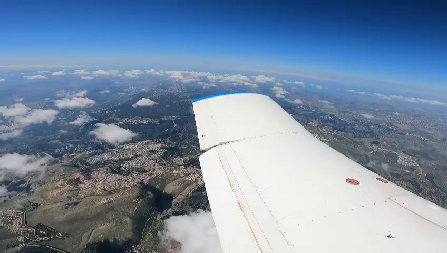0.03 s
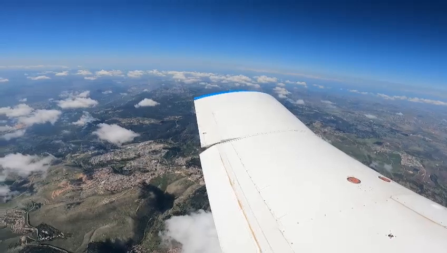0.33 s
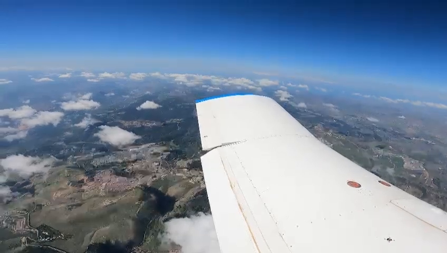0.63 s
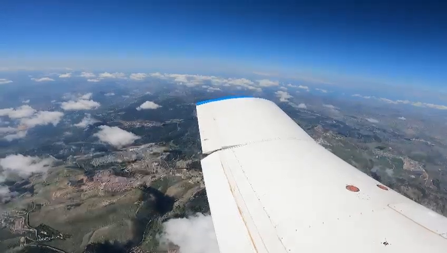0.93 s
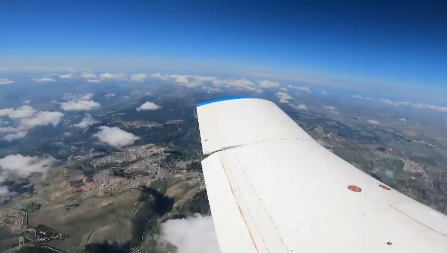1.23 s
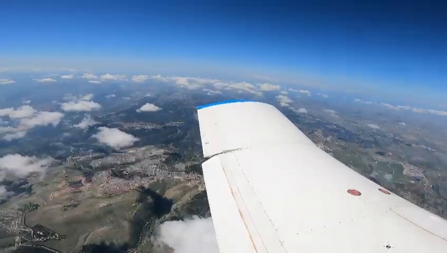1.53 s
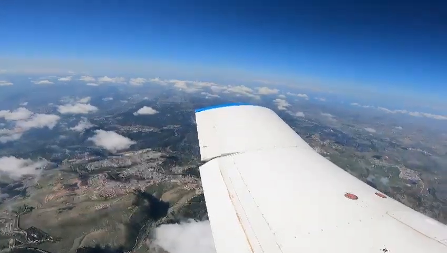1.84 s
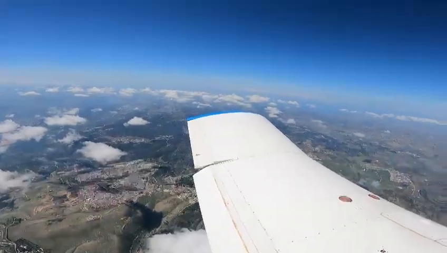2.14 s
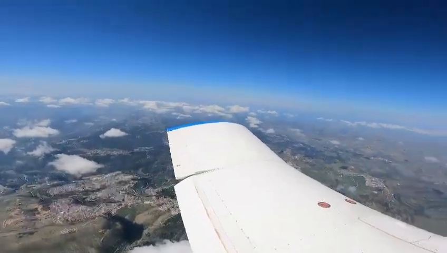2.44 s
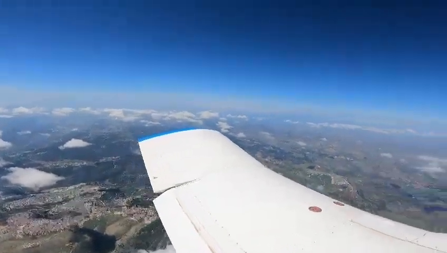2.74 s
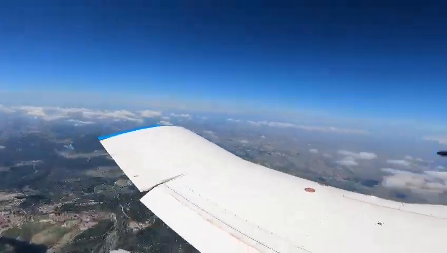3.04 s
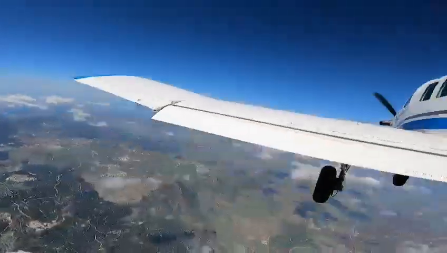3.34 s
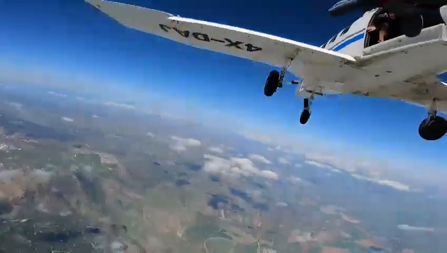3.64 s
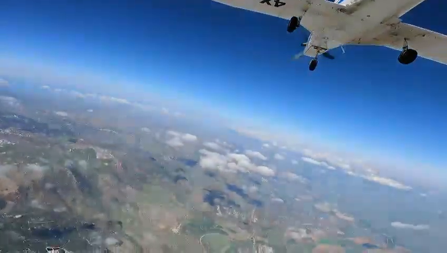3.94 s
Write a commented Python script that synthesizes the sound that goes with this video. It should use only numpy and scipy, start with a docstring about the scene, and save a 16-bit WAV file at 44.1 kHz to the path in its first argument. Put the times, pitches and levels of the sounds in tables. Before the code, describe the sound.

Loud wind roars and buffets the microphone from the start, with short crackling gusts and a propeller droning underneath. Around 2.9 seconds the wind tears harder and the drone swells, then sinks in pitch and fades as the skydiver leaves the plane. Low thumps and a rumble hit from about 3.5 to 3.75 seconds. A quieter, brighter rush with a breathy rising whistle takes over until 4 seconds.

```python
"""Skydiver leaving a propeller plane

Heard from a camera outside the door, then falling away. The slipstream buffets and roars on the
microphone and tears in short bursts; the propeller drones beneath it and sinks in pitch after the jump.
Past the thumping wake the roar gives way to a bright rush and a whistle. A limiter holds the peaks."""
import sys
import numpy as np
from scipy import signal
from scipy.fft import rfft, irfft
from scipy.io import wavfile
from scipy.ndimage import uniform_filter1d, minimum_filter1d

SR = 44100
rng = np.random.default_rng(int(sys.argv[2]) if len(sys.argv) > 2 else 0)


def generate_wav(sig):
    """Save sig (samples, or channels by samples) to the path in sys.argv[1] as 16-bit PCM at SR."""
    pcm = np.round(np.clip(np.atleast_2d(sig).T, -1, 1) * 32767).astype(np.int16)
    wavfile.write(sys.argv[1], SR, pcm)


N = 176400
T = np.arange(N) / SR
HZ = np.fft.rfftfreq(N, 1 / SR)


def amp(db):
    """Decibels to gain."""
    return 10 ** (np.asarray(db) / 20)


def unit(x):
    """Scale to rms 1."""
    return x / np.sqrt(np.mean(x ** 2) + 1e-20)


def curve(points):
    """Rows of (t/s, value) interpolated to every sample."""
    return np.interp(T, *np.transpose(points))


def coloured(x, spectrum):
    """Filter x by rows of (f/Hz, level/dB); rms 1."""
    hz, db = np.transpose(spectrum)
    gain = amp(np.interp(np.log(HZ + 1), np.log(hz + 1), db))
    return unit(irfft(rfft(x) * gain, N))


def noise(spectrum):
    """Shaped noise, rms 1."""
    return coloured(rng.standard_normal(N), spectrum)


def wander(rate_hz, slowest_hz=3):
    """Smooth random motion between two rates; rms about 1, peaks softened."""
    gain = HZ / (HZ + slowest_hz) / (1 + (HZ / rate_hz) ** 2)
    motion = unit(irfft(rfft(rng.standard_normal(N)) * gain, N))
    return 3 * np.tanh(motion / 3)


def stirred(spectrum, flow, eddy_db, gust_db, own_db):
    """Noise whose level follows the shared eddies and gusts, plus its own flutter."""
    eddies, gusts = flow
    return unit(noise(spectrum) * amp(eddy_db * eddies + gust_db * gusts + own_db * wander(130)))


def churning(spectrum, evenness):
    """Noise with swells and lulls partly evened out, as under steady wind pressure."""
    x = noise(spectrum)
    power = uniform_filter1d(abs(signal.hilbert(x)) ** 2, size=441)
    return unit(x / (power + 0.12) ** (evenness / 2))


def puffs(table):
    """Envelope of Gaussian swells, summed in power."""
    return np.sqrt(sum(amp(db) ** 2 * np.exp(-np.pi * ((T - centre_s) / length_s) ** 2)
                       for centre_s, length_s, db in table))


def gliding_band(table, width_hz, order=1):
    """Noise band riding on a multiple of a moving pitch."""
    times_s, hz, db = np.transpose(table)
    band = unit(irfft(rfft(rng.standard_normal(N)) / (1 + (HZ / width_hz) ** 2) ** 2, N))
    carrier = np.sin(2 * np.pi * order * np.cumsum(np.interp(T, times_s, hz)) / SR)
    return amp(np.interp(T, times_s, db)) * unit(band * carrier)


def propeller():
    """Blade-rate harmonics, shaken in level and phase by turbulent air."""
    # blade passage: t/s, f/Hz
    blade_rate = [(0, 91.95), (1, 92.14), (2.7, 91.9), (3.05, 89.8), (3.4, 86.6), (3.7, 86), (4, 87.8)]
    # drone envelope: t/s, level/dB
    level = [(0, -20), (.5, -26), (.67, -15.5), (.8, -28), (1.2, -24), (1.47, -21.5), (1.8, -23),
             (2.05, -21), (2.25, -26), (2.5, -20.5), (2.72, -21.5), (3.0, -12.5), (3.2, -21), (3.45, -29.5),
             (3.75, -28.5), (4, -42)]
    # harmonics: multiple, level/dB
    harmonics = [(1, 4), (2, -6), (4, -9)]
    cycles = np.cumsum(curve(blade_rate)) / SR
    tone = np.zeros(N)
    for k, db in harmonics:
        gain = amp(db + 2.0 * wander(22, slowest_hz=6.5))
        tone += gain * np.sin(2 * np.pi * (k * cycles + rng.random()) + .25 * k * wander(13))
    return amp(curve(level) + 2.5) * unit(tone)


def open_air():
    """Smooth, bright rush swelling as the jumper falls clear."""
    # rush envelope: t/s, level/dB
    level = [(3.62, -78.5), (3.68, -44.5), (3.76, -41), (3.83, -31), (3.9, -30.5), (4, -29.5)]
    # rush spectrum: f/Hz, level/dB
    spectrum = [(200, -4.5), (450, 5), (800, 7.5), (1300, 3.5), (2100, -1), (3100, 1), (4200, -1.5),
                (5100, -4.5), (6500, -5), (8000, -14), (10000, -25), (11600, -32.5)]
    return amp(curve(level) + 0.64 * wander(30)) * noise(spectrum)


def airflow_resonance():
    """Faint resonance and its octave, rising as the camera turns from the plane."""
    # resonance track: t/s, f/Hz, level/dB
    sweep = [(3.15, 930, -70), (3.32, 1020, -36), (3.42, 1113, -39), (3.52, 1388, -38), (3.6, 1390, -60)]
    return gliding_band(sweep, width_hz=170) + amp(-6) * gliding_band(sweep, width_hz=170, order=2)


def whistle():
    """Air past the camera: a breathy band with a narrow core, climbing with fall speed."""
    # whistle track: t/s, f/Hz, level/dB
    track = [(3.618, 3490, -79), (3.681, 3720, -42.5), (3.738, 3890, -42.5), (3.83, 4160, -37),
             (4, 4164, -40)]
    return amp(-0.6) * gliding_band(track, width_hz=1100) + amp(-8) * gliding_band(track, width_hz=260)


def hiss(flow):
    """Fine hiss in the slipstream."""
    # hiss envelope: t/s, level/dB
    level = [(.1, -46), (.3, -54), (.56, -54), (.67, -50), (.76, -54), (1.5, -53.5), (2.7, -52.5),
             (2.84, -56), (2.86, -37), (2.9, -45), (2.94, -47), (2.97, -62), (3.1, -46), (3.15, -42.5),
             (3.26, -48), (3.42, -59), (3.6, -43), (3.63, -51.5)]
    # hiss spectrum: f/Hz, level/dB
    spectrum = [(1500, 0), (3000, 7), (4200, 4.5), (5500, -2.5), (7000, -7.5), (9000, -12), (10300, -23),
                (11600, -41)]
    return amp(curve(level) + 5.0) * stirred(spectrum, flow, eddy_db=1.0, gust_db=0.9, own_db=-0.1)


def spits():
    """Air spits on the microphone: snaps with ragged tails, dulled by its cover."""
    # spits: t/s, peak level/dB
    hits = [(.167, -22), (0.2234, -25), (.2284, -23), (0.3043, -17.5), (0.3386, -22), (0.371, -20.5),
            (.4274, -16.5), (0.5204, -17.5), (0.703, -20.5), (0.968, -19), (1.026, -21), (1.0713, -19),
            (1.6891, -21.5), (1.7776, -30), (1.8337, -23), (1.8594, -23), (2.1822, -29), (2.5244, -24),
            (2.7373, -18.5), (2.7819, -20.5), (2.8553, -18), (2.8787, -9), (2.946, -14), (3.3369, -16)]
    # spit spectrum: f/Hz, level/dB
    spectrum = [(200, -3.5), (900, 4), (2200, 1), (4000, -4), (6000, -15.5), (9000, -33), (11500, -55)]
    decay_s = 0.0006
    tails = sum(amp(db) * (T >= at_s) * np.exp(-abs(T - at_s) / decay_s) for at_s, db in hits)
    snaps = np.maximum(np.diff(tails, prepend=0), 0)
    bursts = amp(10.0) * snaps + amp(-4.5) * tails * rng.standard_normal(N)
    return np.std(bursts) * coloured(bursts, spectrum)


def tearing(flow):
    """Flow breaking off the camera body: crackling noise, flaring in gusts, smoother after the jump."""
    # tearing envelope: t/s, level/dB
    level = [(.1, -34.5), (.3, -41.5), (.46, -35.5), (.58, -38), (.8, -39.5), (1.3, -44), (1.6, -44.5),
             (1.8, -39), (1.9, -50), (2.02, -43.5), (2.23, -45.5), (2.36, -39.5), (2.58, -45.5),
             (2.71, -39.5), (2.81, -33.5), (2.89, -29.5), (2.98, -29.5), (3.1, -31.5), (3.2, -31.5),
             (3.3, -31.5), (3.35, -29.5), (3.42, -32), (3.51, -29), (3.615, -38.5), (3.64, -59),
             (3.77, -41), (4, -37)]
    # tearing spectrum: f/Hz, level/dB
    spectrum = [(200, -8), (600, -1.5), (1050, 7), (1700, 2.5), (2600, -2.5), (4000, -12), (5500, -22),
                (8000, -31), (10000, -40), (12000, -64.5)]
    # raggedness: t/s, share of flow modulation
    ragged = [(2.8, 1), (3.2, 0.3)]
    # gusts across the microphone: centre t/s, length/s, peak level/dB
    gusts = [(.168, 0.031, -29.5), (.22, 0.018, -23.5), (.308, 0.043, -26.5), (.371, 0.0066, -29),
             (.425, 0.039, -32), (.517, 0.0056, -30), (.665, 0.042, -26.5), (.86, 0.034, -33.5),
             (.922, 0.012, -32), (.968, 0.0089, -33), (1.035, .014, -29.5), (1.252, .016, -31),
             (1.382, 0.016, -32), (1.43, .012, -34), (1.537, 0.0082, -34), (1.776, 0.0081, -28),
             (1.857, 0.021, -29), (1.978, 0.017, -31), (2.445, 0.019, -42), (2.528, 0.01, -27),
             (2.868, 0.05, -23.5), (2.915, 0.049, -29)]
    # gust spectrum: f/Hz, level/dB
    gust_spectrum = [(200, 1), (700, 13.5), (1500, 9.5), (2600, -5.5), (4000, -7), (5500, -19.5),
                     (8000, -31.5), (11500, -58)]
    snaps_per_s = 1100
    snaps = (rng.random(N) < snaps_per_s / SR) * rng.uniform(-1.02, 1, N)
    crackle = amp(-7.5) * unit(coloured(snaps, spectrum) * amp(1.1 * flow[0]))
    calmed = np.array(flow) * curve(ragged)
    steady = stirred(spectrum, calmed, eddy_db=3.0, gust_db=2.0, own_db=1.0) + crackle
    ripping = stirred(gust_spectrum, flow, eddy_db=5.0, gust_db=-1.5, own_db=2.5) + crackle
    return amp(curve(level) + 3.0) * steady + amp(1.5) * puffs(gusts) * ripping


def hoot():
    """Hollow, hooting part of the roar."""
    # hoot envelope: t/s, level/dB
    level = [(.1, -37), (1.0, -25), (1.4, -21), (2.1, -21), (2.7, -19.5), (3.2, -23.5), (3.35, -28.5),
             (4, -55)]
    # hoot spectrum: f/Hz, level/dB
    spectrum = [(20, -71.5), (120, -15), (205, -2), (245, 11), (295, 10.5), (340, 6), (395, 3.5),
                (460, -10), (800, -34.5), (8000, -110)]
    return amp(curve(level) + 0.6) * churning(spectrum, evenness=0.36)


def wake():
    """Falling through the plane's wake: low thumps and a rumble that holds, then stops dead."""
    # thumps: centre t/s, length/s, peak level/dB
    thumps = [(3.265, 0.03, -19), (3.6, 0.024, -14.5), (3.625, 0.013, -7), (3.708, 0.0086, -12.5),
              (3.735, .0053, -13)]
    # thump spectrum: f/Hz, level/dB
    thump_spectrum = [(20, -21), (60, -2), (130, -3), (270, -1.5), (420, -10), (720, -15), (1000, -22.5),
                      (2000, -37.5), (10000, -100)]
    # rumble envelope: t/s, level/dB
    level = [(3.54, -70), (3.562, -14), (3.63, -14), (3.68, -17), (3.738, -17), (3.75, -73)]
    # rumble spectrum: f/Hz, level/dB
    spectrum = [(20, -16.5), (60, 7.5), (130, -0.5), (270, -2.5), (420, -14), (760, -15.5), (1000, -29.5),
                (2000, -44), (10000, -100)]
    return puffs(thumps) * noise(thump_spectrum) + amp(curve(level)) * churning(spectrum, evenness=0.47)


def buffeting():
    """Deep turbulence beating on the microphone."""
    # buffet envelope: t/s, level/dB
    level = [(.1, -22.5), (.38, -20), (.47, -24), (.56, -16), (.66, -26), (.74, -23.5), (.84, -22),
             (1.0, -22.5), (1.27, -27), (1.34, -23), (1.46, -23), (1.53, -24), (2.1, -22.5), (2.4, -25.5),
             (2.68, -21), (2.78, -24), (2.93, -24.5), (3.1, -21), (3.16, -30), (3.25, -28.5), (3.5, -21.5),
             (3.61, -20), (3.73, -22), (3.755, -34), (3.81, -35), (3.85, -27.5), (4, -22.5)]
    # buffet spectrum: f/Hz, level/dB
    spectrum = [(8, -18.5), (22, -6), (40, 5.5), (60, 9.5), (85, 3.5), (130, -9.5), (220, -8), (600, -80.5),
                (3000, -110)]
    return amp(curve(level) + 2.0) * churning(spectrum, evenness=.85)


def roar(flow):
    """Slipstream roar on the microphone, stirred by eddies and gusts."""
    # roar envelope: t/s, level/dB
    level = [(.1, -10.5), (.4, -17), (.6, -14), (1.0, -16), (1.5, -14.5), (2.2, -17), (2.72, -15.5),
             (2.9, -11), (3.12, -17), (3.16, -20), (3.21, -17.5), (3.3, -24.5), (3.38, -17.5), (3.54, -22),
             (3.62, -21.5), (3.66, -43), (3.76, -31), (3.81, -29.5), (3.88, -25), (4, -26.5)]
    # roar spectrum: f/Hz, level/dB
    spectrum = [(40, -24), (80, -3.5), (110, 3), (145, 0), (190, 2), (290, -4), (420, -4), (650, -8.5),
                (900, -14.5), (1300, -23.5), (2200, -38), (12000, -100)]
    return amp(curve(level) + 0.61) * stirred(spectrum, flow, eddy_db=1.0, gust_db=0.6, own_db=0.92)


def scene():
    """Wind and propeller at one microphone."""
    eddy_hz, gust_hz = 228, 22
    flow = wander(eddy_hz, slowest_hz=22), wander(gust_hz, slowest_hz=14)
    slipstream = buffeting() + roar(flow) + wake() + hoot() + hiss(flow) + tearing(flow) + spits()
    return (slipstream + propeller() + open_air() + airflow_resonance() + whistle())[None]


def record(dry):
    """Abrupt cut-in, fast peak limiter, low-pass."""
    start_s, cutoff_hz = .085, 11600
    ceiling_db, recover_db_per_s = -5.5, 134.5
    x = dry[0] * np.clip((T - start_s) * 1000, 0, 1)
    over_db = np.maximum(20 * np.log10(abs(x) + 1e-9) - ceiling_db, 0)
    recovery_db = T * recover_db_per_s
    held_db = np.maximum.accumulate(over_db + recovery_db) - recovery_db
    gain_db = uniform_filter1d(minimum_filter1d(-held_db, size=89), size=89)  # 2 ms attack
    low_pass = signal.firwin(511, cutoff_hz, window=("kaiser", 9), fs=SR)
    return signal.oaconvolve(x * amp(gain_db), low_pass, "same")[None]


dry = scene()
out = record(dry)
generate_wav(out)
```